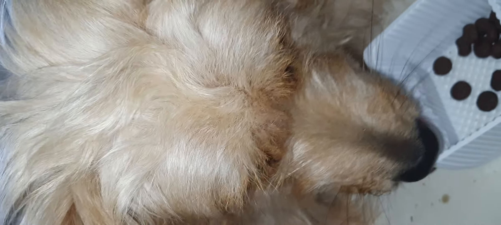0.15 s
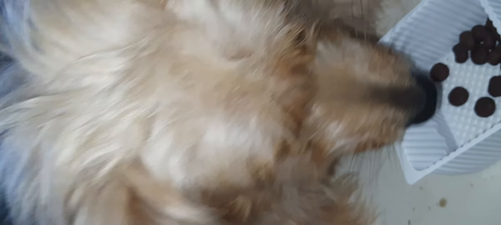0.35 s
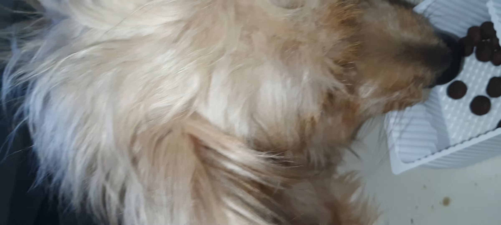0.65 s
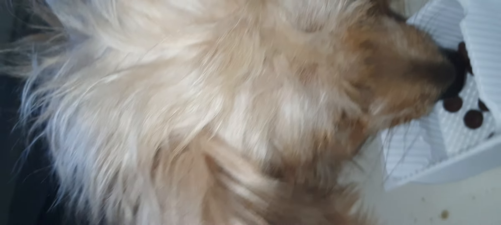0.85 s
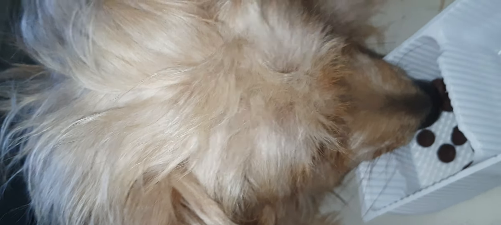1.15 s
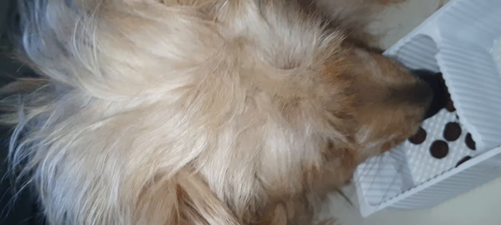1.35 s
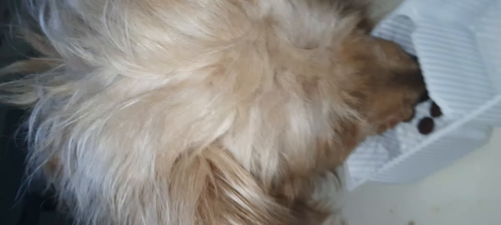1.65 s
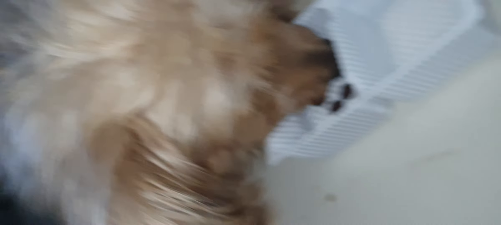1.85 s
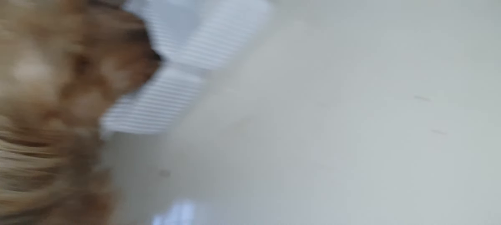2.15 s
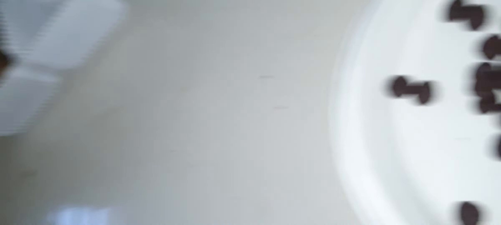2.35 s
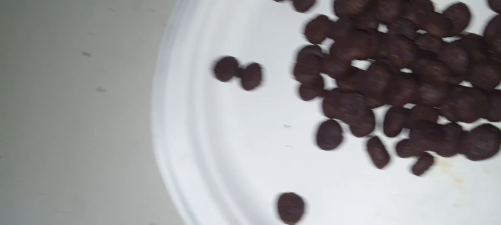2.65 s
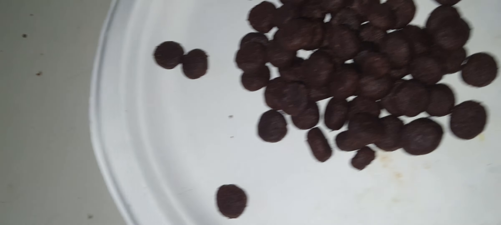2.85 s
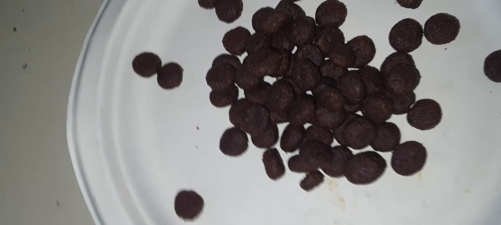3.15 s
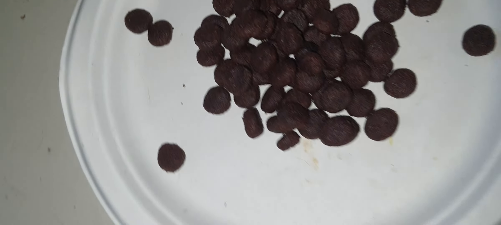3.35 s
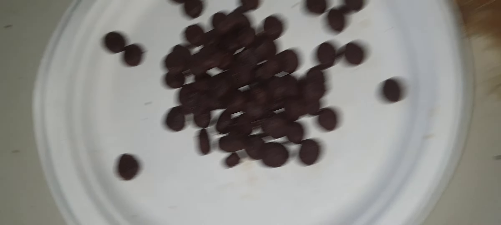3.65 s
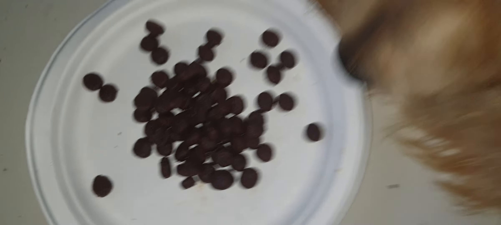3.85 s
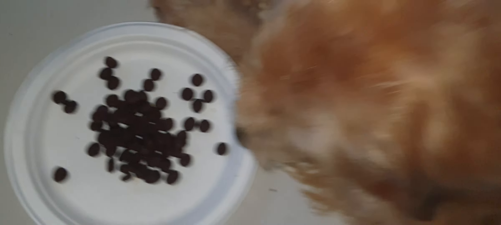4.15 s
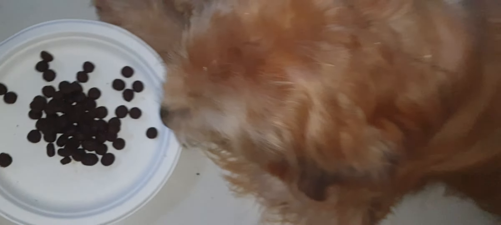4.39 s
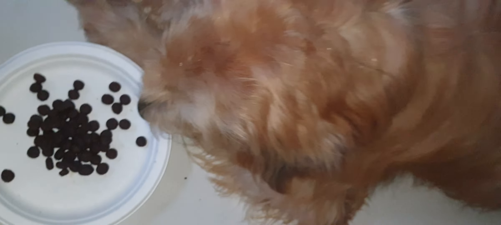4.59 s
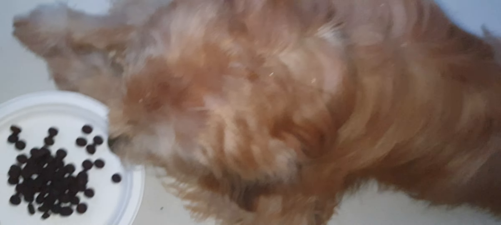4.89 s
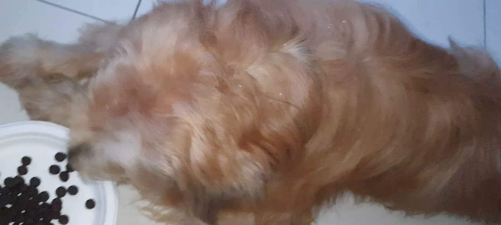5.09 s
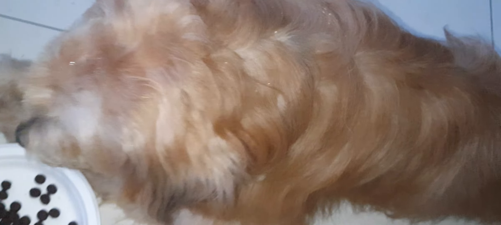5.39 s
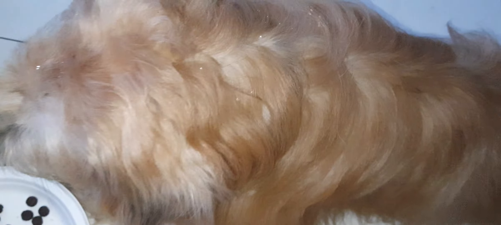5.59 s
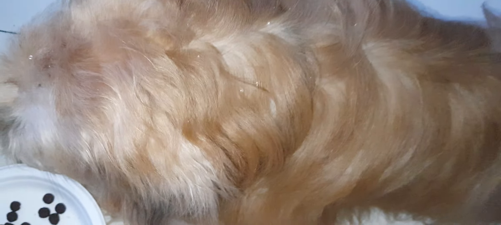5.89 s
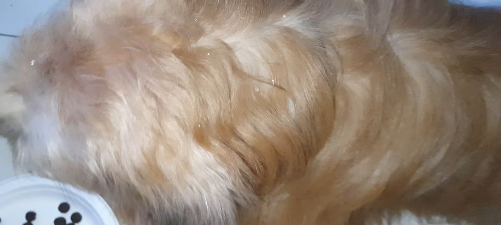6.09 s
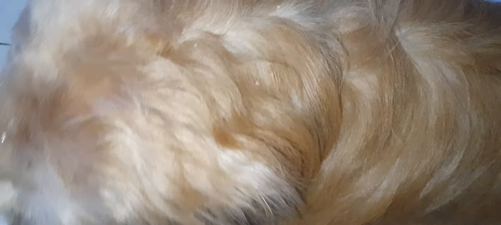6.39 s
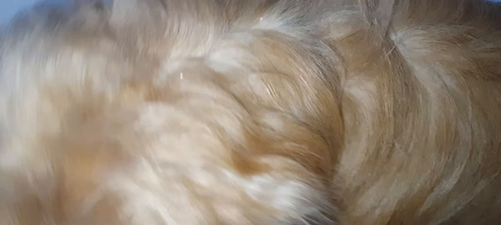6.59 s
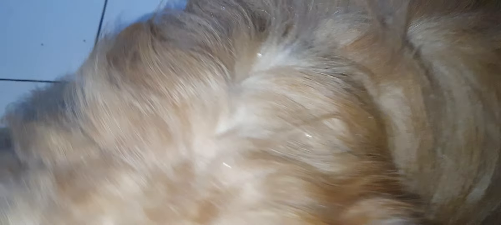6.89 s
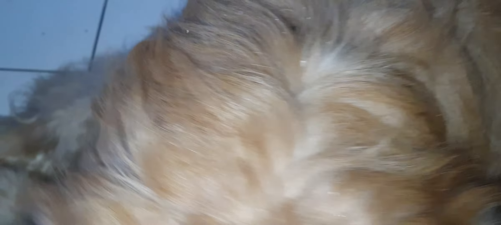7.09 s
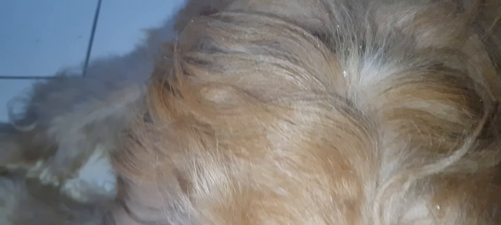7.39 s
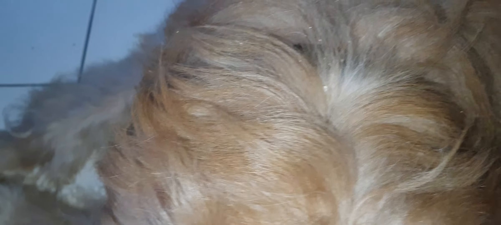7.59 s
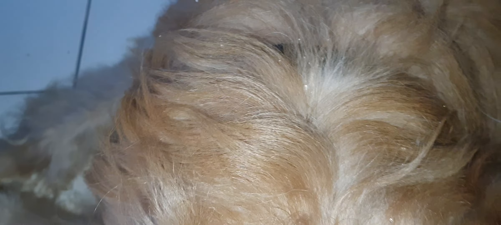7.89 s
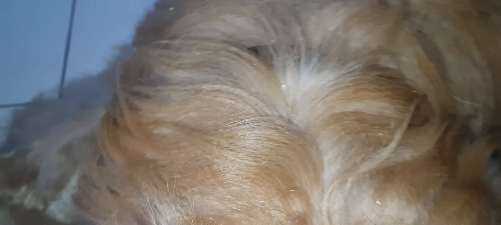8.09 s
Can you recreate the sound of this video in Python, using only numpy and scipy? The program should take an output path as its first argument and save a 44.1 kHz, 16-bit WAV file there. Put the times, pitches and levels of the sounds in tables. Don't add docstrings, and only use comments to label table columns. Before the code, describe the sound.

A dog gives one short, deep fluttering growl, then sniffs and crunches dry biscuits close up, over a low handling rumble in a hard tiled room.

```python
import sys
import numpy as np
from scipy import signal
from scipy.fft import rfft, irfft
from scipy.io import wavfile
from scipy.ndimage import uniform_filter1d

SR = 44100
rng = np.random.default_rng(int(sys.argv[2]) if len(sys.argv) > 2 else 0)


def pcm_store(signal):
    levels = np.round(np.clip(np.atleast_2d(signal), -1, 1) * 32767)
    wavfile.write(sys.argv[1], SR, levels.astype(np.int16).T)


def volts_from_db(level):
    exponent = np.asarray(level, float) / 20
    return 10 ** exponent


N = 363384

# t/s, pitch f/Hz, effort level/dB, mouth opening level/dB
GROWL = [
    (0.705, 113.3, -16, 1),
    (0.74, 109.7, -16, 11.5),
    (0.84, 110, -18, -1.5),
    (0.96, 107.5, -18, 0.5),
    (1.1, 103.7, -17, -0.5),
    (1.19, 107.1, -23, -4),
    (1.29, 101.6, -26.5, -9),
    (1.37, 107.4, -29, -9),
    (1.5, 99.8, -41, -12),
]
# t/s, chest level/dB, throat level/dB, chest tuning ratio, throat tuning ratio
SLAPS = [(.694, 3.5, 0.5, 1.01, 1.0), (.726, 3.5, 0, 1.05, 1.04), (.752, 0.5, -2, 1.11, 1.006),
         (.786, 2.5, -2, 1.0, 1), (.817, 0, -1, 1, 0.98), (.842, 4, -2, .97, .98),
         (0.874, 0.5, -0.5, .97, .96), (.903, 1, -2.5, 1, 0.97), (.936, -6, -3, 1.04, 0.99),
         (.962, 0.5, -2.5, 1.02, 1.03), (1.008, 0.5, -1, 1, 0.97), (1.048, -1.5, 0, 0.98, 0.94),
         (1.083, -1, -1, 1.0, 1.0), (1.124, 2.5, 0, 0.97, 1.05), (1.159, -5, 4.5, 1.1, 0.96),
         (1.191, -4, 6.5, 1.03, 1.02), (1.209, 7, -2, 1.04, 1.0), (1.257, 2.5, 7, 0.95, 1.01),
         (1.296, 2.5, 0, 1, 1)]
# t/s, level/dB, f/Hz, length/s
MOUTH_RINGS = [(0.684, 0, 1450, .008), (0.732, 4, 1450, 0.016), (0.759, 8, 1490, .01),
               (0.789, 4.5, 1450, .014), (0.82, -4, 1430, .01), (0.843, -0.5, 1570, 0.0088),
               (0.885, -1.5, 1450, 0.02), (0.949, 8, 1450, 0.0062), (0.977, 2, 1450, 0.013),
               (1.015, 1, 1350, 0.012), (1.08, -9, 1490, 0.016), (1.12, -4, 1450, 0.0092),
               (1.163, 5, 1210, 0.0033), (.7, -1, 1740, .012), (0.772, -4, 1800, .015),
               (.875, -5, 1730, .01), (1.177, -8, 1480, .007), (1.193, 1.5, 1450, 0.0063),
               (1.184, -2, 1180, .007), (1.23, -3, 1410, 0.0097), (1.297, -7, 1420, .008)]
# f/Hz, width/Hz, level/dB
CHEST = [(80.5, 27, -3.5), (102.7, 38, 2.5), (150, 30, 0), (205, 36, 0.5), (240.3, 34, -2.5)]
THROAT = [(416, 58, 4.5), (504, 66, 6), (593, 53, 4), (815, 92, -7), (940, 130, -39)]
MOUTH = [(1180, 75, -4), (1450, 250, 14), (2240, 1130, 3)]
NOSE = [(2200, 500, -7.5), (4300, 520, 3), (4970, 450, 5), (5370, 430, -1.5), (6500, 380, -7),
        (6800, 1240, 3), (12260, 1900, -4)]

# t/s, peak level/dB, ring f/Hz, length/ms
BISCUIT_CRACKS = [(0.11, -43, 4930, 1.5), (0.3114, -44.5, 2460, 1.5), (0.408, -37, 3480, 1.3),
                  (0.551, -36, 6160, 1.6), (1.624, -21.5, 3700, 0.67), (1.6879, -15.5, 6660, 0.71),
                  (1.697, -18.5, 3720, 0.56), (1.718, -20.5, 3200, 1.1), (1.8046, -29, 4700, 2),
                  (1.8394, -27, 4060, 1.6), (1.8608, -16, 4200, 0.45), (2.2544, -24, 3320, 0.92),
                  (2.278, -27, 5900, 1.5), (2.2962, -13.5, 5200, 0.39), (2.407, -26.5, 1750, 8.2),
                  (2.477, -6, 3820, 1.2), (2.5806, -21.5, 5030, 8.4), (2.6174, -13.5, 2790, 3.6),
                  (2.642, -15.5, 3690, 0.78), (2.6838, -27, 2450, 2.4), (2.7335, -21, 6320, 0.98),
                  (2.906, -19.5, 3690, 1.9), (2.9223, -11, 4180, 3.2), (3.069, -21.5, 4800, 4),
                  (3.0767, -20, 2150, 5.7), (3.218, -27.5, 1920, 4.2), (3.4205, -14.5, 7640, 2.2),
                  (3.5174, -7.5, 6670, 1), (3.8828, -10.5, 5740, 0.98), (4.222, -31.5, 2420, 1.84),
                  (4.767, -11, 7600, 2.9), (4.7885, -12.5, 7680, 4.5), (4.8862, -21, 2330, 1.7),
                (4.9093, -12, 7060, 3), (5.1442, -23.5, 2700, 3.7), (5.215, -20.5, 2560, 4.3),
                (5.7533, -18, 2350, 4.5), (5.797, -16.5, 6800, 1.3), (5.933, -19, 3960, 3),
                (6.1648, -19, 7500, 5.5), (6.24, -20, 6600, 3.4), (6.3997, -26, 2780, 1.9),
                (6.4123, -19.5, 3600, 3.5), (6.4188, -26, 5130, 1.6), (6.516, -22, 1480, 2.5),
                (7.236, -21, 3270, 4.5), (7.4715, -22, 2150, 2.7), (7.5015, -20, 4230, 2.3),
                (7.529, -26, 4080, 3), (7.5631, -10.5, 2190, 3.1), (7.58, -12, 6500, 2.6),
                (7.587, -7, 2400, 1.2), (7.717, -10.5, 5000, 1.5), (7.873, -17, 6340, 3.5),
                (7.929, -19, 1730, 6.7), (7.9868, -24.5, 5300, 3.9), (8.0184, -19, 7300, 3.1),
                (8.0612, -14.5, 7300, 0.85), (8.1318, -21.5, 6800, 1.1), (8.1805, -21, 7400, 0.41)]
# t/s, peak level/dB,
# ring f/Hz
SPLINTERS = [(0.075, -42, 4100), (0.2846, -46, 4920), (3.236, -25.5, 1900), (3.398, -28, 8424),
             (3.6347, -37, 4320), (3.7898, -34, 6500), (4.5, -30, 4100), (4.3, -23, 2310), (8, -23, 1935),
             (8.0849, -23, 6300), (4.65, -33, 13000), (4.5, -33, 12000), (7.5461, -19, 2240),
             (7.641, -21, 6500), (7.679, -17, 7400), (7.693, -20, 4167), (7.498, -22, 6800),
             (7.785, -23, 4630), (7.744, -30, 2000), (7.5795, -15, 2484), (7.588, -8, 8100),
             (0.7, -20, 5600), (0.742, -24, 5000), (1.38, -30, 12970), (3.9, -23.5, 1620),
             (3.5185, -14, 3500), (2.4785, -13, 2000), (1.689, -21.5, 1500), (1.8623, -23.5, 1300),
             (2.298, -29, 2800), (3.884, -14.5, 2650), (5.216, -16.5, 6500), (5.85, -36, 1200),
             (5.893, -25, 1800), (5.6, -33, 7000),
             (.810, -28, 6000), (.826, -28, 6500), (.849, -28, 5000), (.985, -27, 7200), (1.101, -32, 13000),
         (1.125, -31, 12500), (1.162, -26, 12000), (2.685, -27, 6000), (2.5, -25, 6500), (2.918, -17, 6000),
         (2.924, -14.5, 1500), (2.955, -26, 2500), (2.437, -29, 1200), (2.686, -25, 1200),
         (3.050, -30, 5000), (4.715, -26, 13500), (5.934, -23, 1700), (4.768, -22, 4860),
         (4.790, -28, 2200), (4.917, -22, 6400), (4.940, -24, 7200), (5.095, -30.5, 6400),
         (5.220, -27, 2500), (6.787, -27, 1852), (6.811, -26, 5400), (6.859, -26, 1667),
         (6.926, -20, 13500), (7.695, -27, 2300), (7.719, -16, 2770), (7.748, -22, 5500),
         (7.874, -14, 6500), (7.890, -21.5, 1700), (7.891, -29, 4200), (7.971, -23, 5500),
         (8.035, -23, 7000), (8.040, -26, 5500), (8.066, -22, 6500), (8.187, -25, 6500)]
# t/s, left minus right level/dB
JAW_SIDE = [(0.3, -36.5), (1.7, -11), (2.55, -11), (2.7, -5.5), (3.1, -7), (3.9, -16.5), (4.7, 0),
            (5.5, -5.5), (6.3, 0), (7.3, -5.5), (8.1, -16.5)]

# t/s, peak level/dB, fade/s, dull part level/dB
BITES = [(0.001, -51, 0.12, 1), (0.501, -43.5, 0.2, -26), (2.615, -43, 0.08, -2.5),
         (2.906, -42.5, 0.17, -4.5), (3.06, -41, 0.057, -1), (3.882, -50.5, 0.066, 1),
         (4.763, -40, 0.11, -10), (4.909, -44.5, 0.089, -5.5), (5.215, -50, 0.1, 2),
         (5.754, -46.5, 0.15, -1), (5.933, -45.5, 0.069, -8), (6.237, -43, 0.092, -8.5),
         (6.4, -42.5, 0.11, -3.5), (7.218, -42.5, 0.11, -0.5), (7.493, -44.5, 0.28, 1),
         (7.585, -34.5, 0.042, 0.5), (7.62, -43, 0.23, 1)]
# t/s, peak level/dB, fade/s, dull part level/dB
SNIFFS = [(0.195, -38, 0.049, -12.5), (0.37, -52.5, 0.4, -10), (0.66, -56, 0.16, 4.5), (1.05, -52, .4, -6),
          (1.33, -45.5, 0.23, -5.5), (1.46, -48, 0.11, -5), (1.61, -52, 0.038, -7),
          (1.83, -53.5, 0.14, -2.5), (2.026, -51, 0.044, -11), (2.36, -52, 0.13, -3), (2.53, -56, 0.24, 3),
          (2.73, -47.5, 0.077, -2.5), (3.28, -60.5, 0.11, -4), (3.46, -55.5, .13, -3), (4.254, -63, 1, 2),
          (5.45, -69, 1, 1), (6.178, -52, 0.072, -17), (6.49, -46, 0.054, -18), (6.841, -45.5, 0.12, -6.5),
          (7.04, -51, 0.63, -11.5), (7.263, -39, 0.073, -20), (7.71, -37, 0.14, -4.5),
          (7.935, -42, 0.15, -2), (8.18, -44, 0.43, -18.5)]
# t/s, lift level/dB, length/s
AIR_SWELLS = [
    (0.198, 6, .05),
    (1.29, 1, 0.033),
    (4.268, 11, 0.44),
    (4.703, 14, 0.066),
    (3.3, 4, .3),
    (6.64, -14, 0.072),
    (7.41, -14, 0.071),
]
# t/s, peak
# level/dB, f/Hz, width/Hz, fade/s
HOLLOWS = [(0.001, -52, 3500, 700, .08), (2.62, -48, 2300, 900, .04), (2.93, -47, 5000, 800, .09),
           (2.931, -47, 7200, 1200, .1), (3.4205, -31, 7900, 1500, .004), (3.5175, -27, 7600, 1500, .003),
           (4.768, -45, 4500, 900, .05), (4.775, -40, 7200, 1500, .12), (4.912, -45, 7000, 1500, .07),
           (5.22, -53, 2500, 900, .08), (6.8, -52, 7200, 1500, .1), (7.59, -42, 2200, 700, .05)]
# f/Hz, level/dB per Hz
BRIGHT = [(1500, -11), (3000, -4.5), (4000, -0.5), (5500, 2), (7200, 1.5), (9000, 4.5), (11000, 3.5),
          (16000, -7)]
DULL = [(500, -1), (1000, -0.5), (2000, 6), (2800, 2), (4000, -13), (8000, -37)]
AIRY = [(8000, -48), (10000, -5), (13000, -2), (16000, 2.5)]

# t/s, peak level/dB, ring f/Hz
TRAY = [
    (2.41, -42, 490),
    (3.077, -31.5, 650),
    (4.93, -37, 460),
    (5.754, -38.5, 940),
    (6.412, -32.5, 1310),
    (7.588, -24, 1070),
]

# t/s, level/dB
HAND = [(0.0, -29.5), (0.314, -31.5), (0.66, -34), (1.56, -46), (2.08, -44), (2.45, -47.5), (2.58, -38.5),
        (3.05, -39), (3.86, -34.5), (4.05, -42.5), (4.55, -46), (4.91, -40), (5.13, -46), (5.95, -44.5),
        (6.09, -50), (6.5, -42), (6.73, -50), (7.2, -42.5)]
# f/Hz, width/Hz, level/dB
HUM = [(97.9, 17, 0)]
# f/Hz, level/dB per Hz
RUMBLE = [(20, -73), (40, -17.5), (63, -7), (90, -3), (110, -2.5), (145, -8.5), (185, -17.5), (260, -17),
          (500, -53.5)]
MURMUR = [(120, -30), (200, -5.5), (240, -9), (320, 4.5), (400, -3), (700, -7), (1100, -9.5), (2000, -21.5),
          (4000, -34.5), (16000, -89)]
HISS = [(500, -35), (6000, -6), (11000, -19), (15000, -2), (17000, 7)]
# f/Hz, level/dB
PORT = [(20, -1), (7400, 2), (8400, -8), (9600, -21.5), (10500, -17.5), (12000, -9), (15650, -4),
        (15900, -44), (16600, -40), (17000, -59)]

GROWL_END_S = 1.58
FADE_DB = 13
LEFT_DB = -6.5


def growl():
    hz, effort_db, open_db = curves(GROWL)
    t = np.arange(N) / SR
    peak_s = GROWL[0][0]
    on = (t > 0.67) & (t < GROWL_END_S)
    attack_db = -1003 * np.maximum(peak_s - t, 0)
    release_db = -11 * np.clip(1 - (GROWL_END_S - t) / 0.05, 0, 1)
    ends_db = attack_db + release_db
    chest_db = effort_db + ends_db
    throat_db = chest_db - 12.5 + 0.36 * open_db
    mouth_db = chest_db - 33 + open_db

    breath_lead_s, gasp_s = 0.0072, 0.083
    after = np.maximum(t - peak_s, 0)
    breath_db = -48 + 16 * np.exp(-after / gasp_s) - 6.5 * after
    breath_db += np.roll(ends_db, -int(breath_lead_s * SR))

    flap_hz, steady_s = 28.45, 0.88
    flaps = flap_hz * (t - 0.706) - 0.33 * np.clip((steady_s - t) / 0.08, 0, 1)
    flap = np.tanh(3.5 * np.cos(2 * np.pi * flaps) + 1.2)
    growing = np.clip(1 - (steady_s - t) / 0.12, 0.33, 1)
    calming = np.clip((1.32 - t) / 0.12, 0, 1)
    depth_db = 7 * growing * calming

    slap_s, slap_chest_db, slap_throat_db = np.transpose(SLAPS)[:3]
    last = np.maximum(np.searchsorted(slap_s, t) - 1, 0)
    since = np.clip(t - slap_s[last], 0, 0.045)
    chest_push = volts_from_db(slap_chest_db[last] - 220 * since)
    throat_push = volts_from_db(slap_throat_db[last] - 420 * since)

    phase = np.cumsum(hz * (1 + 0.09 * walk(50))) / SR
    phase -= phase[(slap_s[last] * SR).astype(int)]
    new_cycle = np.diff(np.floor(phase), prepend=0) > 0
    pulses = unit(new_cycle * volts_from_db(2.2 * walk(120)))
    puffs = rng.standard_normal(N) * np.exp(-(phase % 1) / 0.45)
    new_slap = np.diff(last, prepend=-1) > 0
    slaps = 800 / 30 * uniform_filter1d(new_slap * volts_from_db(walk(30)), 40)

    chest = cavity((pulses + 0.7 * puffs + 1.77 * slaps) * chest_push, CHEST, column=3)
    chest *= volts_from_db(chest_db + 0.94)
    throat = cavity((pulses + 1.36 * puffs + 1.8 * slaps) * throat_push, THROAT, column=4)
    throat *= volts_from_db(throat_db + 2.5)
    valley_hz, valley_width_hz = 320, 50
    valley = signal.iirnotch(valley_hz, valley_hz / valley_width_hz, SR)
    chest, throat = signal.lfilter(*valley, [chest, throat])

    mouth_air = (pulses + 2.2 * puffs) * chest_push * volts_from_db(3 * walk(30))
    mouth = unit(ring(mouth_air, MOUTH)) * volts_from_db(mouth_db)
    mouth += mouth_rings(pulses + 2 * puffs)
    chopped_db = breath_db + 1.8 * depth_db * (flap - 0.6) + 1.5 * walk(150)
    breath = unit(ring(pair(0.3, 2.6), NOSE)) * volts_from_db(chopped_db)

    voice = ports([chest, chest], -7, 24)
    voice += ports([throat, throat], -9, 18)
    voice += ports([mouth, mouth], -8, 16)
    return on * (voice + ports(breath, -16.5, 5))


def cavity(x, modes, column):
    tail = 8000
    out = np.zeros(N)
    edges = [int(row[0] * SR) for row in SLAPS] + [int(GROWL_END_S * SR)]
    for row, a, b in zip(SLAPS, edges, edges[1:]):
        moved = [(hz * row[column], width, db) for hz, width, db in modes]
        out[a:b + tail] += ring(np.append(x[a:b], np.zeros(tail)), moved)
    return out / np.sqrt(np.mean(out[edges[0]:edges[-1]] ** 2))


def mouth_rings(air_flow):
    ring_db, width_hz, half = -32.5, 164, 2000
    out = np.zeros(N)
    t = np.arange(-half, half) / SR
    for s, db, hz, length_s in MOUTH_RINGS:
        near = slice(int(s * SR) - half, int(s * SR) + half)
        patch = ring(air_flow[near] * np.exp(-(t / length_s) ** 2), [(hz, width_hz, 0)])
        out[near] += patch / np.max(np.abs(patch)) * volts_from_db(ring_db + db)
    return out


def cracks():
    size, right_lag, side_scatter_db, splinter_ms = 2000, 11, 2.5, 1.4
    out = np.zeros((2, N + 2 * size))
    t = np.arange(size) / SR
    side_db, = curves(JAW_SIDE)
    broad = signal.butter(1, [1500, 14000], "band", fs=SR)
    jaw = signal.butter(2, [900, 2200], "band", fs=SR)
    small = [(*row, splinter_ms) for row in SPLINTERS]
    for s, db, hz, ms in BISCUIT_CRACKS + small:
        start = int(s * SR)
        pan_db = side_db[start] + side_scatter_db * rng.standard_normal()
        dust = rng.standard_normal((3, size)) * volts_from_db(3.5 * rng.exponential(size=size))
        fade = np.exp(-t / (0.00079 * max(ms, 0.2))) + 0.06 * np.exp(-t / 0.0081)
        spray = (dust[0] + 0.8 * dust[1:]) * fade / np.sqrt(np.mean(dust ** 2))
        spray[:, 3] += 4.5
        piece = ring(spray, [(hz, 0.83 * hz, 0)]) + 0.33 * signal.lfilter(*broad, spray)
        knock = signal.lfilter(*jaw, spray)
        piece /= np.max(np.abs(piece), axis=1, keepdims=True)
        knock /= np.max(np.abs(knock), axis=1, keepdims=True)
        knock_db = -26.5 + 0.46 * (db + 20.5)
        both = volts_from_db(db - 5) * ports(piece + volts_from_db(knock_db) * knock, pan_db, 0)
        out[0, start:start + size] += both[0]
        out[1, start + right_lag:start + right_lag + size] += both[1]
    return out[:, :N]


def crumble():
    bright_db, dull_db = chewing()
    flicker = walk(60)
    bright_grind_db = bright_db + 4 + 0.26 * flicker + 0.46 * walk(25)
    dull_grind_db = dull_db - 0.5 + 2.07 * flicker + 1.2 * walk(25)
    bright = unit(colour(pair(0.055, 3.2), BRIGHT)) * volts_from_db(bright_grind_db)
    dull = unit(colour(pair(0.34, 3.2), DULL)) * volts_from_db(dull_grind_db)
    bright += unit(colour(lone_grains(90), BRIGHT)) * volts_from_db(bright_db - 11.5)
    dull += unit(colour(lone_grains(60), DULL)) * volts_from_db(dull_db - 12.5)

    t = np.arange(N) / SR
    airy_db = -46.5 + 0.99 * (bright_db + 45) + 1.5 * walk(30) + 1.5 * walk(5)
    for s, lift_db, length_s in AIR_SWELLS:
        airy_db += lift_db * np.exp(-((t - s) / length_s) ** 2)
    bright += unit(colour(pair(0.1, 2), AIRY)) * volts_from_db(airy_db)
    return ports(bright + dull + hollows(), LEFT_DB, -12)


def lone_grains(per_s):
    shared = (rng.random(N) < per_s / SR) * rng.standard_normal(N)
    return shared + 0.3 * (rng.random((2, N)) < per_s / SR)


def chewing():
    rest_db, bite_lag_s, bite_rise_s, fade_curve = -62.5, 0.006, 0.01, 1.33
    sniff_rise = 0.81
    t = np.arange(N) / SR
    power = volts_from_db(2 * rest_db) * np.ones((2, N))
    rows = [(s + bite_lag_s, *rest, bite_rise_s) for s, *rest in BITES]
    rows += [(*row, sniff_rise * row[2]) for row in SNIFFS]
    for s, db, fade_s, dull_db, rise_s in rows:
        near = slice(max(int((s - 3 * rise_s) * SR), 0), int((s + 3 * fade_s) * SR))
        away = np.maximum((s - t[near]) / rise_s, (t[near] - s) / fade_s)
        shape_db = db - FADE_DB * away ** fade_curve
        power[:, near] += volts_from_db(2 * (shape_db + np.array([[0], [dull_db]])))
    return 10 * np.log10(power)


def hollows():
    out = np.zeros((2, N))
    t = np.arange(SR // 4) / SR
    for s, db, hz, width, fade_s in HOLLOWS:
        grit_db = 3.5 * np.minimum(rng.exponential(size=len(t)), 5)
        grains = rng.standard_normal((2, len(t))) * volts_from_db(grit_db)
        rattle = unit(ring(grains, [(hz, width, 0)])) * volts_from_db(db - FADE_DB * t / fade_s)
        out[:, int(s * SR):][:, :len(t)] += rattle
    return out


def tray():
    out = np.zeros(N)
    t = np.arange(2000) / SR
    for s, db, hz in TRAY:
        out[int(s * SR):][:2000] += volts_from_db(db + 3.5) * np.sin(2 * np.pi * hz * t) * np.exp(-t / 0.0027)
    return ports([out, out], -1, 4)


def walls(x):
    t60_s, build_s = 0.22, 0.036
    t = np.arange(SR // 2) / SR
    tail = rng.standard_normal((2, len(t))) * volts_from_db(-60 * t / t60_s) * np.clip(t / build_s, 0, 1)
    tail = signal.sosfilt(signal.butter(1, 500, "high", fs=SR, output="sos"), tail)
    return signal.fftconvolve(x[None], tail / np.sqrt(np.sum(tail[0] ** 2)), axes=1)[:, :N]


def air():
    rumble_db, = curves(HAND)
    t = np.arange(N) / SR
    duck_db = -5.5 * (t > GROWL[0][0]) * np.clip(1 - (t - 2.6) / 0.29, 0, 1)
    murmur_db = -49.5 + 0.042 * (rumble_db + 44.5) + 0.21 * (chewing()[1] + 56) + duck_db
    near = 0.46 * np.clip(2 - t / 1.05, 0, 1)
    air_flow = pair(0.95)
    rumble = (1 - near) * unit(colour(air_flow, RUMBLE)) + near * unit(ring(air_flow, HUM))
    rumble *= volts_from_db(rumble_db + 0.75 * walk(12))
    murmur = unit(colour(pair(0.68), MURMUR)) * volts_from_db(murmur_db + 0.8 * walk(15))
    hiss = unit(colour(pair(0), HISS)) * volts_from_db(-67)
    return ports(rumble, LEFT_DB, 0) + ports(murmur, -5, -10) + hiss


def unit(x):
    return x / np.sqrt(np.mean(x ** 2))


def curves(table):
    s, *columns = np.transpose(table)
    return [np.interp(np.arange(N) / SR, s, c) for c in columns]


def colour(x, points):
    hz, db = np.transpose(points)
    grid = np.arange(4097) * SR / 8192 + 1
    log_gain = np.interp(np.log(grid), np.log(hz), db) * np.log(10) / 20
    ceps = irfft(log_gain)
    ceps[1:4096] *= 2
    ceps[4097:] = 0
    response = irfft(np.exp(rfft(ceps)))
    return signal.fftconvolve(x, np.atleast_2d(response), axes=1)[:, :N]


def ring(x, modes):
    out = 0
    for hz, width, db in modes:
        peak = signal.iirpeak(hz, hz / width, SR)
        out = out + volts_from_db(db) * signal.lfilter(*peak, signal.lfilter(*peak, x))
    return out


def walk(rate):
    k = int(SR / rate)
    steps = np.repeat(rng.standard_normal(N // k + 1), k)
    return 1.3 * uniform_filter1d(uniform_filter1d(steps, k), k)[:N]


def pair(alike, grit_db=0.0):
    grains = volts_from_db(grit_db * np.minimum(rng.exponential(size=N), 5))
    mid, side = rng.standard_normal((2, N)) * grains
    return np.sqrt(1 + alike) * mid + np.sqrt(1 - alike) * side * np.array([[1], [-1]])


def ports(x, pan_db, lag):
    return np.array([np.roll(x[0], lag) * volts_from_db(pan_db / 2), x[1] * volts_from_db(-pan_db / 2)])


def scene():
    dog = growl() + cracks() + tray()
    echo = volts_from_db(-19) * ports(walls(dog.mean(0)), LEFT_DB, 0)
    return dog + echo + crumble() + air()


def band_limit(x):
    return signal.sosfilt(signal.butter(12, 17000, fs=SR, output="sos"), x)


def record(dry):
    mix = np.tanh(1.014 * colour(dry, PORT)) / 1.219
    return band_limit(mix)


dry = scene()
out = record(dry)
pcm_store(out)
```